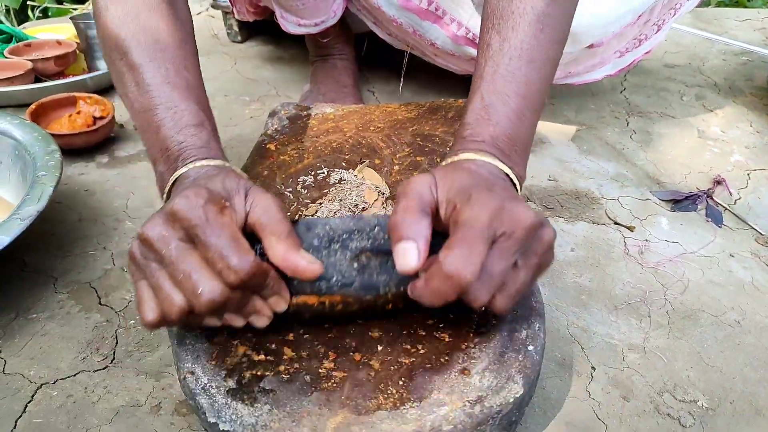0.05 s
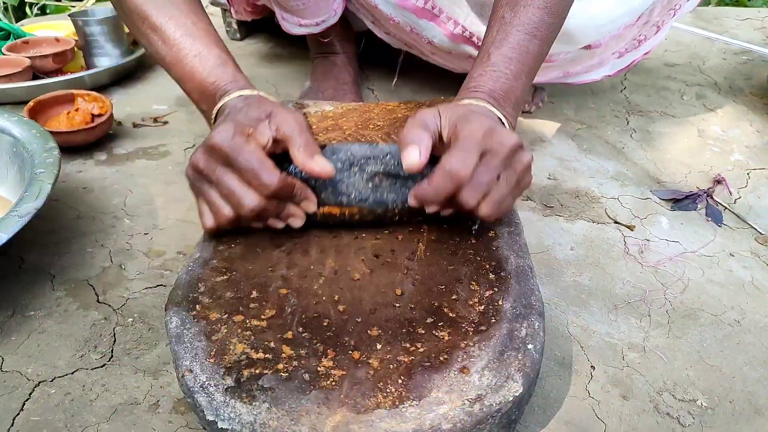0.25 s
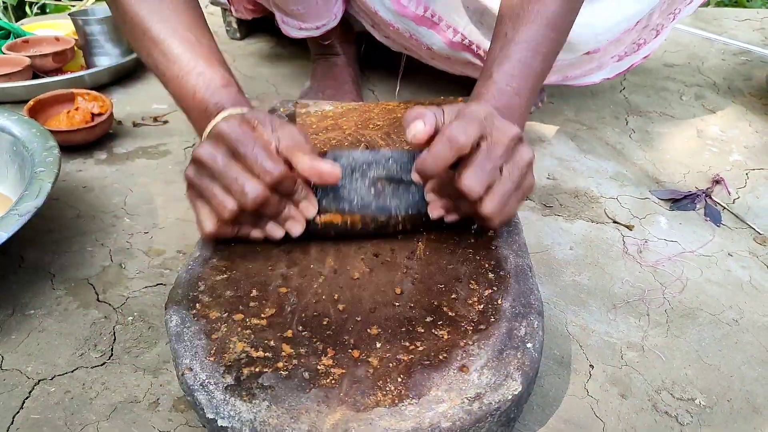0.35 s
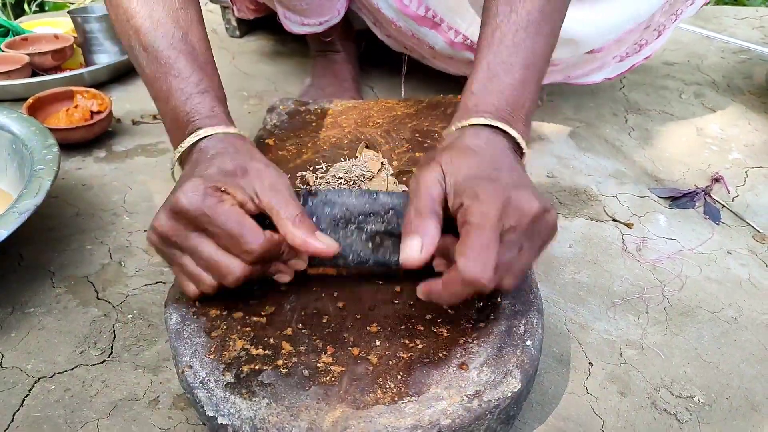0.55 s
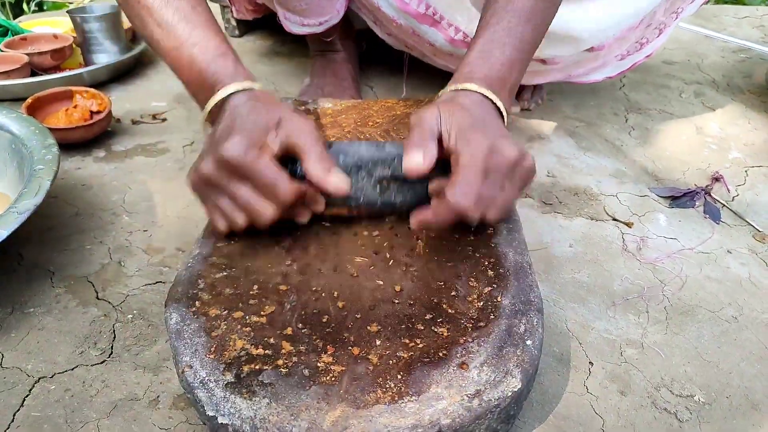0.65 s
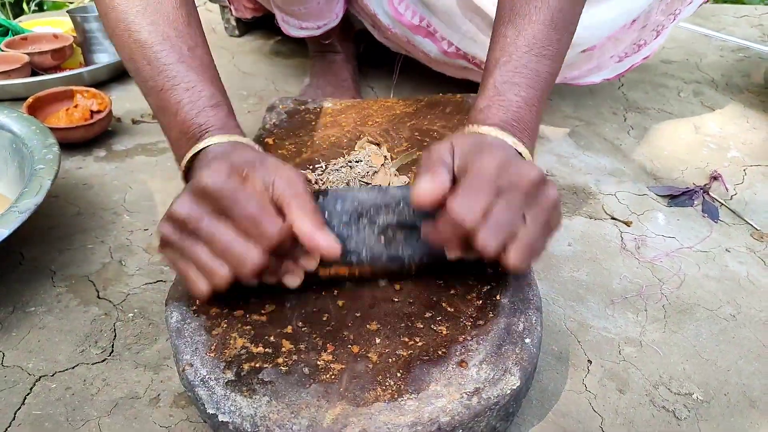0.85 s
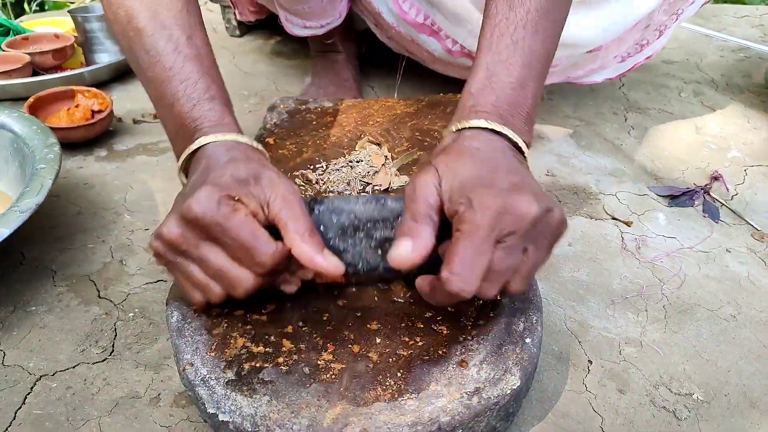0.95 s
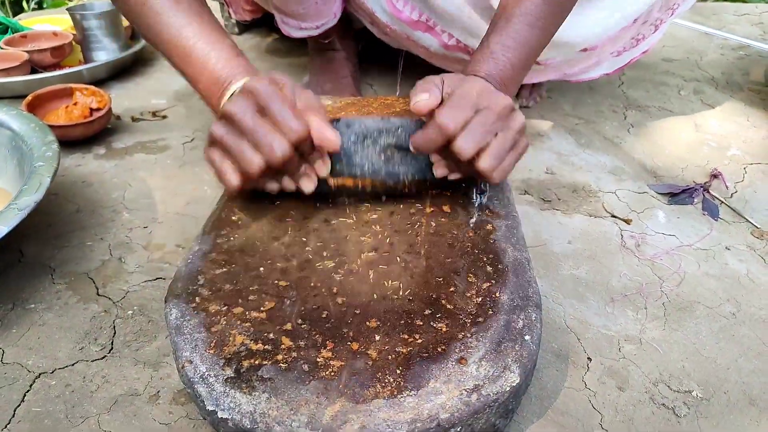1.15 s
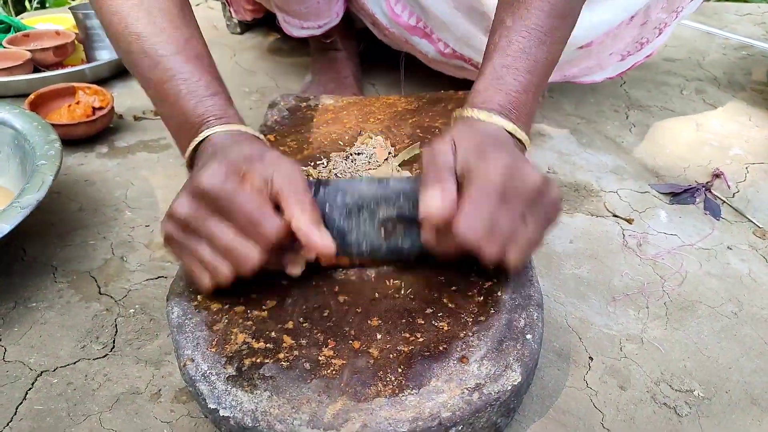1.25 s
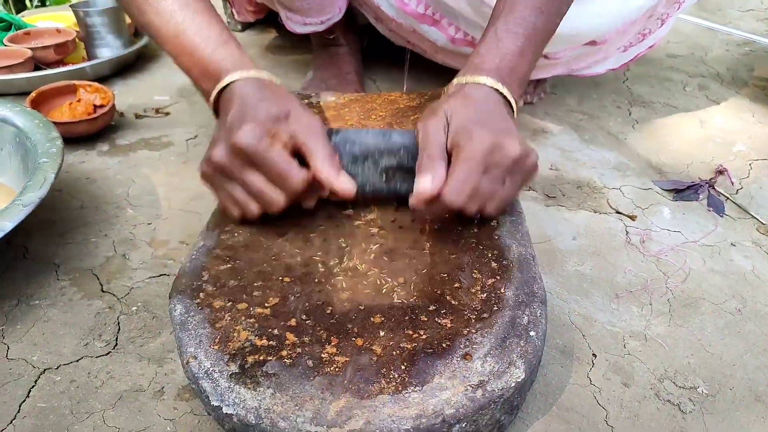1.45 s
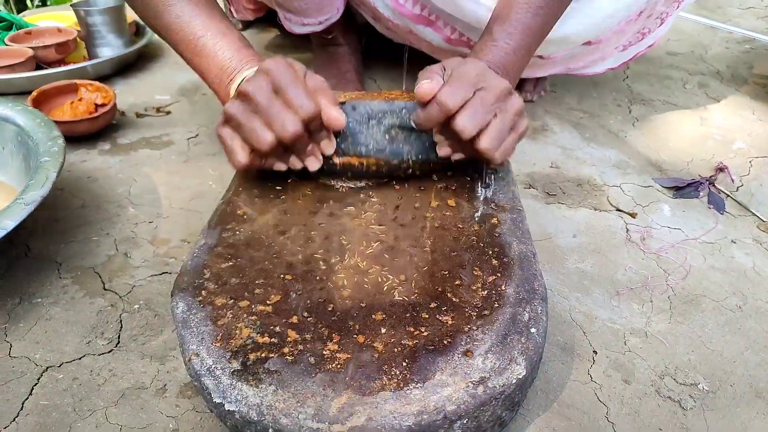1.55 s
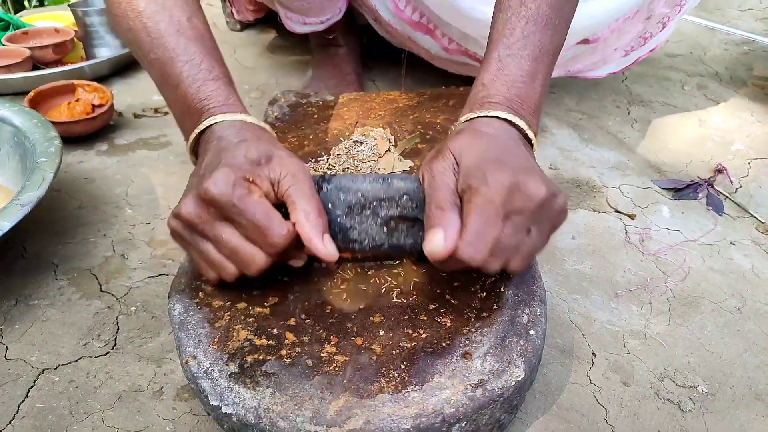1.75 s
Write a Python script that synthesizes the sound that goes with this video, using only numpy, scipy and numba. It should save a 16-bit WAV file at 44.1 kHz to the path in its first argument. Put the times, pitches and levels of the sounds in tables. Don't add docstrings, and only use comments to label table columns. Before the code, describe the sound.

A stone roller scrapes to and fro over gritty seeds on a stone slab, first a hollow juddering drag, then a hard knock and shorter hissing strokes; close stereo microphone in a quiet open yard.

```python
import sys
import numpy as np
from scipy import signal
from scipy.fft import rfft, irfft
from scipy.io import wavfile
from scipy.ndimage import uniform_filter1d
from numba import njit

SR = 44100
rng = np.random.default_rng(int(sys.argv[2]) if len(sys.argv) > 2 else 0)


def amplitude_ratio(level_db):
    exponent = np.asarray(level_db, float) / 20
    return 10 ** exponent


def master_out(mix):
    frames = np.transpose(np.atleast_2d(mix))
    ceiling = np.clip(frames, -1, 1)
    pcm = np.round(ceiling * 32767).astype(np.int16)
    wavfile.write(sys.argv[1], SR, pcm)


N = 79380

# pitch in Hz, level in dB, time to fade by 60 dB in seconds,
# left minus right in dB, delay of the right in ms.
STONE_MODES = [(685, -11, .03, 0, .15), (800, -18, .025, 6, .1), (1000, -12, .024, -1, .15),
               (1322, -6, .036, 1, .15), (1515, -4, .025, -1, .3), (1670, -6, .022, 3, .3),
               (2000, -8, .018, -2, .25), (2240, -10, .018, 0, .1), (2440, -10, .018, 0, .05),
               (2750, -13, .018, 2, .2), (3335, -9, .03, -3, .05), (3680, -18, .018, 0, .1),
               (6200, -28, .012, -6, .1)]
# time in seconds, level in dB, contact time in ms,
# extra dB for the lowest modes, extra dB for the main ring.
KNOCKS = [(.0235, -42, 1.3, 19.5, 10), (.073, -50, .5, -15, 18), (0.4968, -24, 0.17, -15, 5.5),
          (0.518, -28.5, 0.17, -22, 8), (.528, -52, 0.34, -11, -6), (0.5581, -10, 0.37, -5, -2),
          (.5612, -16.5, 0.2, 2, 9.5), (.5645, -34.5, 0.24, -10, 3), (.709, -23, 2, -5, -15),
          (.742, -47, 0.12, 17.5, -12), (.762, -39, 0.22, 6.5, 10), (0.782, -39, 0.74, -2, 11.5),
          (.979, -37, 0.52, 16.5, 18.5), (0.993, -47.5, 1.8, 27, -7), (1.441, -39.5, 1.13, 18.5, 8)]
# start in seconds, length in seconds, level in dB,
# extra dB for the lowest modes, extra dB for the main ring.
DRAGS = [(0.016, 0.028, -51, 14.5, 8.5), (0.052, 0.3, -47.5, -12, 0), (0.269, 0.029, -47, -4, 1),
         (0.522, 0.0317, -47.5, 14.5, 18), (0.558, 0.037, -58.5, 16.5, -18), (0.665, 0.035, -58, 14, 8),
         (0.701, .02, -58, 12, 11), (0.736, 0.0067, -51, 11, -4), (0.756, 0.034, -53.5, -12, 14),
         (0.873, 0.15, -78, -17, 24), (1.305, 0.02, -71, -23, 23), (1.717, 0.045, -66.5, 8.5, 5.5)]
# start, fastest moment and end in seconds, grit in dB, fine crunch in dB.
STROKES = [(-.02, 0.031, 0.032, -57, -74), (0.024, 0.264, 0.38, -46, -57),
           (0.353, 0.403, 0.447, -48.5, -92), (0.475, 0.517, 0.64, -43.5, -56.5),
           (0.646, 0.812, 0.82, -50.5, -70), (0.863, 0.92, 1.014, -46.5, -57),
           (0.905, 0.99, 1.03, -50, -55), (1.072, 1.226, 1.23, -48.5, -72), (1.273, 1.342, 1.48, -45, -59),
           (1.459, 1.597, 1.69, -49.5, -70), (1.696, 1.746, 1.88, -45, -55.5)]
# frequency in Hz, level in dB.
GRIT_COLOUR = [(240, -29), (400, -24), (605, -11), (726, -1.5), (987, -32), (1320, 0), (3970, 0.5),
               (5070, -4.5), (15500, -33.5)]
# frequency in Hz, level in dB.
CRUNCH_COLOUR = [(2940, -6.5), (5000, -32), (6220, -9), (8130, 0), (8400, -7), (11300, 1.5), (15600, -4)]
# time in seconds, level in dB, centre in Hz.
HOLLOW = [
    (0.066, -39, 686),
    (0.139, -34, 800),
    (.21, -40, 768),
    (0.288, -38, 655),
    (.355, -48.5, 508),
]
# time in seconds, extra dB.
SLIPS = [(0.078, 4.5), (.103, 3.5), (.118, 9.5), (.134, -3), (.145, 5), (.156, -1.5), (.169, -2.5),
         (.186, 2), (.203, 9), (.245, 2.5), (0.256, 10), (.283, 7.5), (.291, 0.5)]
# time in seconds, level in dB, pitch in Hz.
SNAPS = [
    (0.921, -34.5, 3850),
    (1.171, -40.5, 5520),
    (1.33, -46, 5570),
    (1.36, -31, 3690),
]
# start in seconds, length in seconds, level in dB,
# centre in Hz, width in Hz.
CATCHES = [(0.013, 0.044, -50, 642, 295), (0.035, 0.23, -60, 6410, 900), (0.095, 0.074, -57, 2520, 400),
           (0.215, 0.076, -47, 3370, 250), (0.316, 0.026, -55.5, 6500, 500),
           (0.469, 0.0067, -55, 6800, 6000), (0.478, 0.0067, -49.5, 4300, 2500),
           (.49, .012, -53.5, 7800, 8000), (.509, .005, -49, 10100, 9000), (0.52, .012, -52, 6300, 1820),
           (0.525, 0.012, -42, 2470, 500), (.535, 0.024, -62.5, 10800, 1490),
           (0.55, 0.0071, -45, 5100, 2540), (0.698, 0.019, -53, 3200, 350), (.732, 0.049, -54, 4230, 895),
           (0.773, 0.021, -45.5, 1665, 80), (0.787, 0.051, -59.5, 2870, 600),
           (0.882, 0.057, -48, 4440, 1170), (0.887, 0.028, -55.5, 5700, 1490),
           (1.125, 0.14, -56.5, 3000, 910), (1.137, 0.082, -62, 5870, 710), (1.278, 0.014, -55, 2850, 1500),
           (1.301, 0.055, -57, 6300, 1190), (1.542, 0.026, -53.5, 562, 200), (1.554, 0.091, -56, 2700, 900),
           (1.715, .08, -58.5, 5970, 1500)]
# pitch in Hz, level in dB, time to fade by 60 dB in seconds.
RIM_MODES = [(683.4, 3, 0.037), (975, 0, 0.02), (1329, -3, 0.032), (1616, 0.5, 0.018), (1990, 3, 0.024),
             (2860, -2.5, 0.016), (3365, -2, 0.02)]
# time in seconds, level in dB.
RIM_BOUNCES = [
    (1.0462, -46),
    (1.0474, -36),
    (1.0486, -35),
    (1.051, -42),
]
# time in seconds, level in dB, pitch in Hz, length in seconds.
ROCKS = [(.015, -45.5, 191, 0.056), (.36, -49.5, 175, 0.063), (.52, -41.5, 180.6, 0.056),
         (.76, -42.5, 209, 0.04), (.83, -42, 165, 0.0076), (.96, -42, 191, 0.04), (1.11, -46.5, 169, 0.076),
         (1.155, -43, 176, 0.045), (1.185, -41.5, 139, 0.054), (1.31, -46.5, 193, 0.022),
         (1.362, -37.5, 164.5, 0.016), (1.408, -35.5, 171.3, 0.018), (1.52, -43.5, 182.7, 0.11),
         (1.555, -35.5, 182.3, 0.025), (1.578, -37.5, 159.6, 0.03), (1.73, -48, 151, 0.037),
         (1.77, -32, 191, 0.033), (.47, -47, 182, .025), (.5, -52, 61.4, 0.093), (.7, -50.5, 205, 0.021),
         (1.045, -52, 184, 0.035)]
# time in seconds, level in dB, pitch in Hz, length in seconds.
WOBBLES = [(0.0116, -43, 327, 0.033), (0.244, -48, 321, 0.054), (1.391, -53.5, 313, 0.078),
           (.08, -53.5, 315, 0.036), (2.4, -51, 300, 0.035)]
# frequency in Hz, level in dB.
YARD_COLOUR = [(20, 3), (60, 2), (170, -5), (400, -21), (1300, -14), (3200, -9), (5000, -18), (6200, -17),
               (8500, -28), (15500, -32)]
# frequency in Hz, left in dB, right in dB.
PORTS = [(303, -3, 1), (800, 2.5, -1), (3000, 5, 5), (5080, -1, 0), (6460, -3, 9.5), (6870, 5, -0.5),
         (9290, 4.5, 5), (9800, -5, 7.5)]

RADIATES_HZ = 560
GRIT_LATE_MS = 0.32


def colour(x, points):
    hz, db = np.array(points, float).T
    f = np.maximum(np.arange(N // 2 + 1) * SR / N, 1)
    return irfft(rfft(x) * amplitude_ratio(np.interp(np.log(f), np.log(hz), db)), N)


def unit(x):
    return x / np.sqrt(np.mean(x ** 2))


def ring(x, hz, t60):
    pole = np.exp(2j * np.pi * hz / SR - np.log(1000) / (t60 * SR))
    return signal.lfilter([1], [1, -pole], x).imag


@njit
def moving_band(x, hz, width):
    y, band, low = np.empty(len(x)), 0., 0.
    for i in range(len(x)):
        g, k = np.tan(np.pi * hz[i] / SR), width / hz[i]
        v = (band + g * (x[i] - low)) / (1 + g * (g + k))
        band, low, y[i] = 2 * v - band, low + 2 * g * v, k * v
    return y


def place(x, pan_db, late_ms):
    f = np.arange(N // 2 + 1) * SR / N
    late = np.exp(-2j * np.pi * f * late_ms / 1000)
    right = irfft(rfft(x) * late, N)
    return np.array([x * amplitude_ratio(pan_db / 2), right * amplitude_ratio(-pan_db / 2)])


def grains(rate, spread_db):
    chance, sign, size = rng.random((3, N))
    clicks = (chance < rate / SR) * np.sign(sign - .5)
    return unit(clicks * amplitude_ratio(-spread_db * np.log(size + .02)))


def wide_grains(rate, spread_db, share):
    both = place(grains(rate, spread_db), 0, GRIT_LATE_MS)
    own = np.array([grains(rate, spread_db) for _ in range(2)])
    return np.sqrt(share) * both + np.sqrt(1 - share) * own


def walk(rate):
    k = int(SR / rate)
    return unit(uniform_filter1d(uniform_filter1d(rng.standard_normal(N), k), k))


def gate(t, start, length, edge):
    inside = np.minimum(t - start, start + length - t)
    return np.sin(np.pi / 2 * np.clip(inside / edge + .5, 0, 1)) ** 2


def tap(t, start, db):
    return amplitude_ratio(db) * np.maximum(1 - np.abs(t - start) * SR, 0)


def soften(x, contact_ms):
    a = np.exp(-2 * np.pi / (contact_ms * SR / 1000))
    return signal.lfilter([(1 - a) ** 2], [1, -2 * a, a * a], x)


def stone(t, grit):
    pushes = [(soften(tap(t, s, db), ms), low, main) for s, db, ms, low, main in KNOCKS]
    slip = soften(grains(1100, 2) * amplitude_ratio(2.2 * walk(70) - 14), .3)
    for s, length, db, low, main in DRAGS:
        pushes.append((amplitude_ratio(db) * gate(t, s, length, 0.004) * slip, low, main))
    pushes.append((grit * amplitude_ratio(-26), -10, 0))
    force, low_db, main_db = (np.array(c) for c in zip(*pushes))
    low, main, rest = amplitude_ratio(low_db) @ force, amplitude_ratio(main_db) @ force, force.sum(0)
    out = 0
    for k, (hz, db, t60, pan_db, late_ms) in enumerate(STONE_MODES):
        if hz < 1100:
            drive = low
        else:
            drive = main if k == 3 else rest
        out = out + place(ring(amplitude_ratio(db) * drive, hz, t60), pan_db, late_ms)
    return signal.sosfilt(signal.butter(4, [RADIATES_HZ, 6000], "band", fs=SR, output="sos"), out)


def scrape(speed, crunch):
    out = 0
    for points, level in ((GRIT_COLOUR, speed), (CRUNCH_COLOUR, crunch)):
        hiss = unit(colour(wide_grains(4100, 3.5, share=0.25), points))
        out = out + hiss * level * amplitude_ratio(2.2 * walk(24))
    return out * amplitude_ratio(-2.3)


def hollow(t):
    s, db, hz = np.array(HOLLOW, float).T
    centre = np.interp(t, s, hz)
    tone = unit(moving_band(moving_band(grains(1500, 0.49), centre, 120.), centre, 240.))
    tone = unit(tone / np.sqrt(uniform_filter1d(tone ** 2, size=300) + .1))
    slips_db = -3 + sum(extra * np.exp(-((t - at) / 0.0049) ** 2) for at, extra in SLIPS)
    judder_db = 1 * walk(120)
    level = amplitude_ratio(np.interp(t, s, db) + slips_db + judder_db - 2.0)
    return place(tone * level * gate(t, s[0], s[-1] - s[0], 0.075), 7, 0.094)


def snaps(t):
    out = 0
    for s, db, hz in SNAPS:
        swell = np.exp(-((t - s - .002) / 0.0049) ** 2)
        out = out + amplitude_ratio(db - 6.5) * swell * np.sin(2 * np.pi * hz * t)
    return place(out * amplitude_ratio(3.5 * walk(600)), -2.5, .2)


def catches(t):
    grit = wide_grains(2200, 4, share=.4)
    out = np.zeros((2, N))
    for s, length, db, hz, width in CATCHES:
        span = slice(max(int((s - length / 2) * SR), 0), int((s + 2 * length + .02) * SR))
        edges = [max(hz - width / 2, 50), min(hz + width / 2, 20000)]
        band = signal.butter(2, edges, "band", fs=SR, output="sos")
        burst = grit[:, span] * gate(t[span], s, length, .4 * length)
        out[:, span] += amplitude_ratio(db) * np.sqrt(SR / 2 / width) * signal.sosfilt(band, burst)
    return out


def rim(t):
    force = soften(sum(tap(t, s, db) for s, db in RIM_BOUNCES), .11)
    force = signal.sosfilt(signal.butter(2, RADIATES_HZ, "high", fs=SR, output="sos"), force)
    out = 0
    for k, (hz, db, t60) in enumerate(RIM_MODES):
        out = out + (-1) ** k * ring(amplitude_ratio(db) * force, hz, t60)
    return place(out, 1.5, .04)


def rocks(t):
    centre = 175 + 0 * t
    wobble = unit(moving_band(moving_band(rng.standard_normal(N), centre, 100.), centre, 57.))
    out = 0
    for s, db, hz, length in ROCKS + WOBBLES:
        body = np.sin(2 * np.pi * hz * (t - s)) + 0.36 * wobble
        out = out + amplitude_ratio(db - 5.5) * gate(t, s, length, 0.022) * body
    return place(out, 2, 0.29)


def echo(near, t):
    tail_t = t[:8000]
    tail = rng.standard_normal((2, 8000)) * amplitude_ratio(-60 * tail_t / .1) * (tail_t > .004)
    return signal.fftconvolve(near, unit(tail) * amplitude_ratio(-17) / np.sqrt(8000), axes=1)[:, :N]


def yard():
    mid = colour(rng.standard_normal(N), YARD_COLOUR)
    side = colour(rng.standard_normal(N), YARD_COLOUR)
    side = colour(side, [(25, -29), (120, -20), (1500, -9.5)])
    return unit(mid + side * np.array([[1], [-1]])) * amplitude_ratio(-60 + 0.5 * walk(6.2))


def scene():
    t = np.arange(N) / SR
    strokes = np.array(STROKES)
    start, fastest, end = strokes[:, :3].T[:, :, None]
    rise_fall = np.minimum((t - start) / (fastest - start), (end - t) / (end - fastest))
    shape = np.sin(np.pi / 2 * np.clip(rise_fall, 0, 1)) ** 1.25
    speed = np.sqrt(amplitude_ratio(strokes[:, 3]) ** 2 @ shape ** 2)
    crunch = np.sqrt(amplitude_ratio(strokes[:, 4]) ** 2 @ shape ** 4)
    near = stone(t, speed * grains(2700, 0.91)) + scrape(speed, crunch) + hollow(t) + snaps(t)
    notch = signal.iirnotch(5050, 5050 / 200, SR)
    mix = signal.lfilter(*notch, near + echo(near, t) + rocks(t) + yard())
    return mix + catches(t) + rim(t)


def roll_off(x):
    return signal.sosfilt(signal.butter(12, 15800, fs=SR, output="sos"), x)


def record(dry):
    ports = np.array(PORTS, float)
    wet = np.array([colour(dry[c], ports[:, [0, c + 1]]) for c in range(2)])
    f, _, z = signal.stft(wet, SR, nperseg=2048, noverlap=1024)
    power = np.abs(z.sum(0)) ** 2
    patch = uniform_filter1d(uniform_filter1d(power, size=9, axis=0), size=2, axis=1)
    around = uniform_filter1d(patch, size=50, axis=0)
    gate_db = -0.2 - 2.6 * (f < 7600)
    keep = (patch > around * amplitude_ratio(gate_db)[:, None] ** 2) | (f < 4000)[:, None]
    below_top = (f < 15500)[:, None]
    wet = signal.istft(z * keep * below_top, SR, nperseg=2048)[1][:, :N]
    return roll_off(wet)


dry = scene()
out = record(dry)
master_out(out)
```